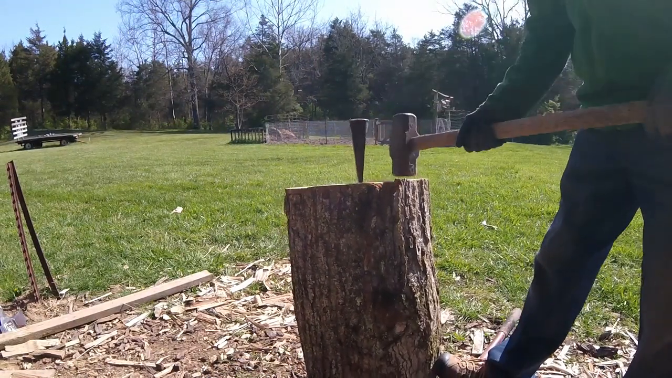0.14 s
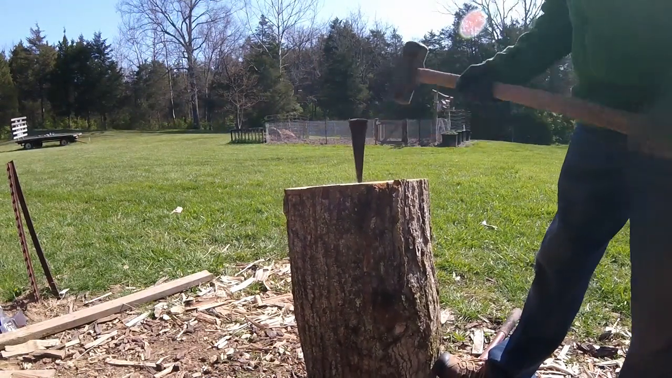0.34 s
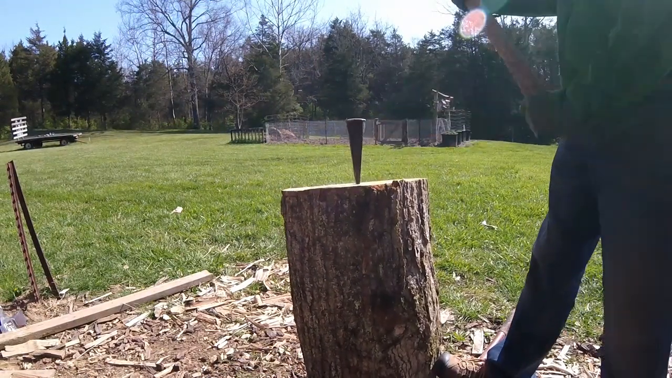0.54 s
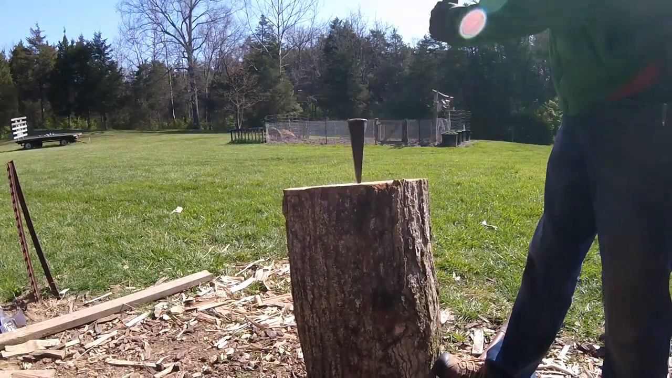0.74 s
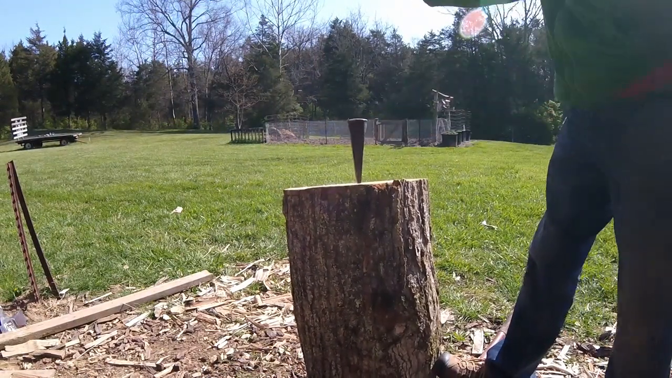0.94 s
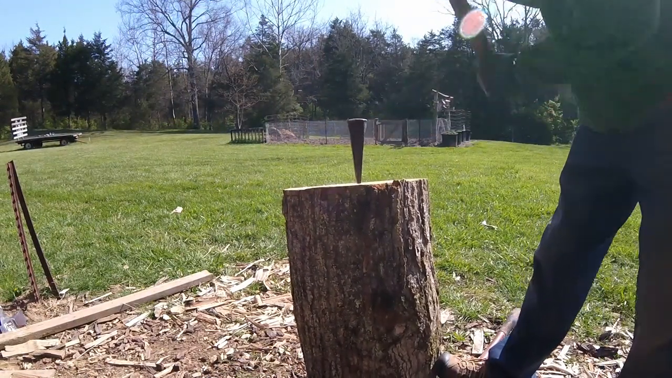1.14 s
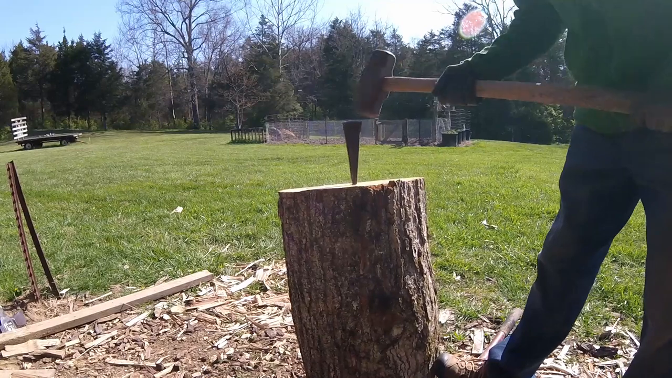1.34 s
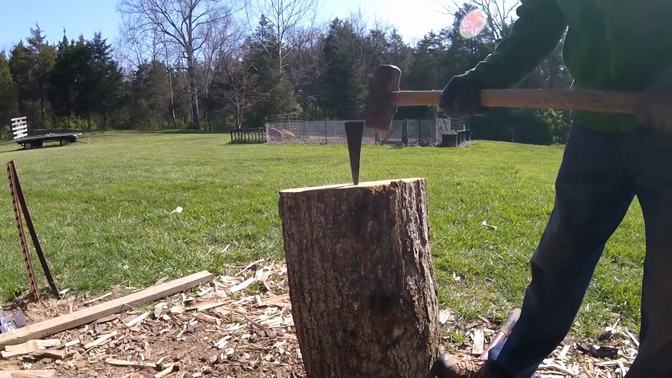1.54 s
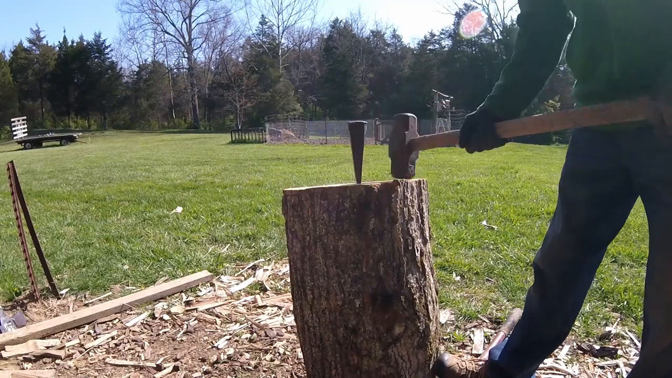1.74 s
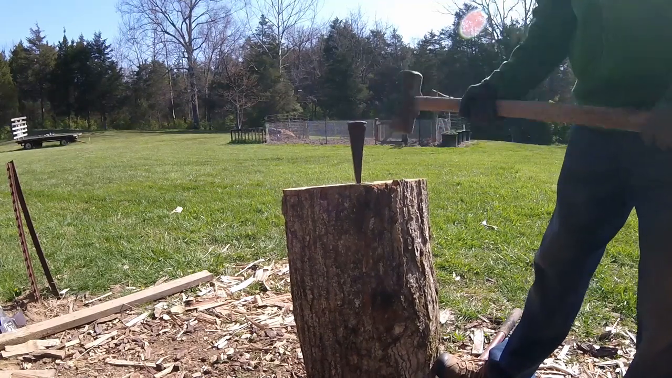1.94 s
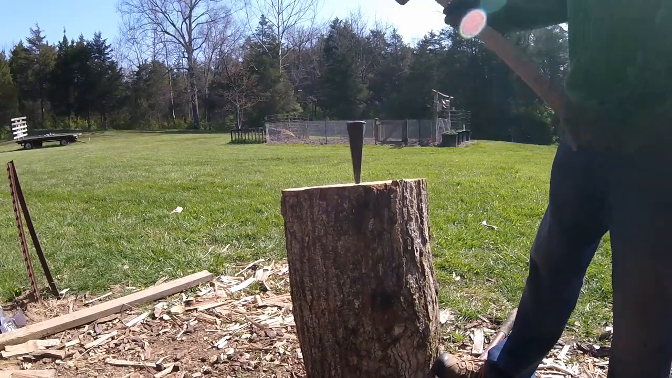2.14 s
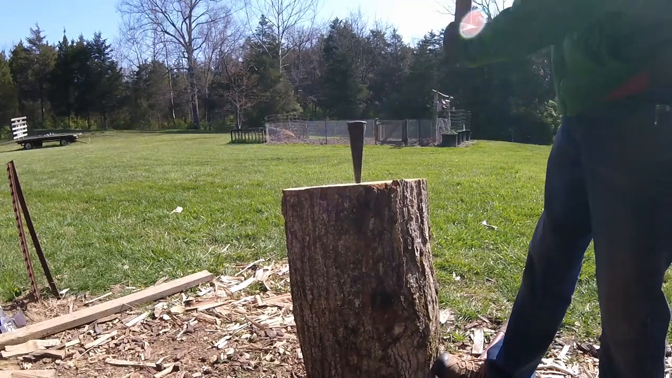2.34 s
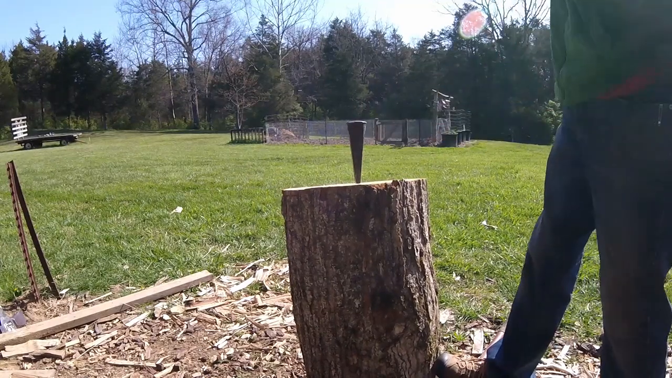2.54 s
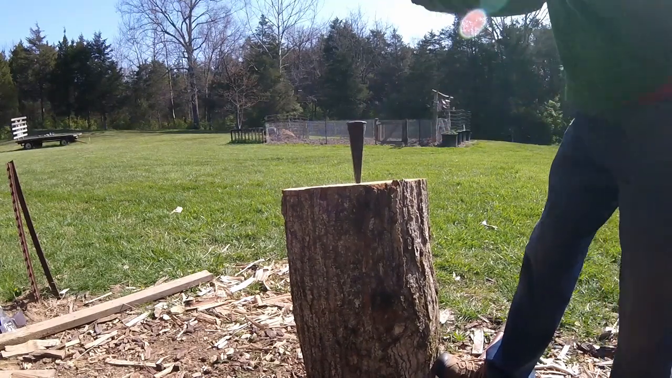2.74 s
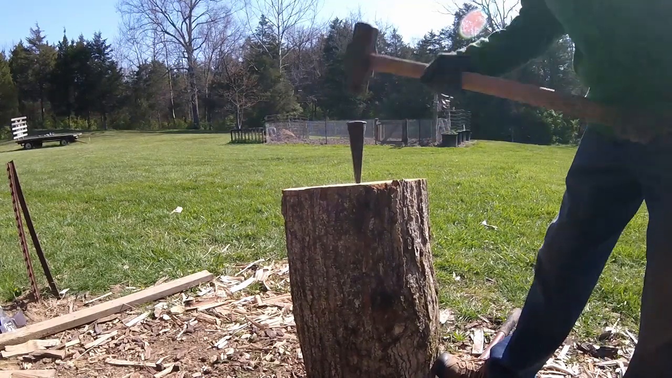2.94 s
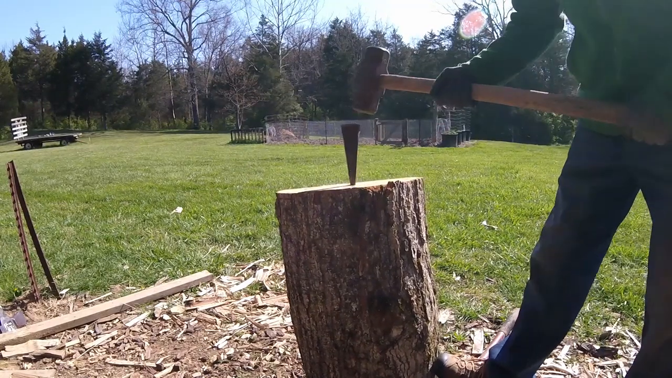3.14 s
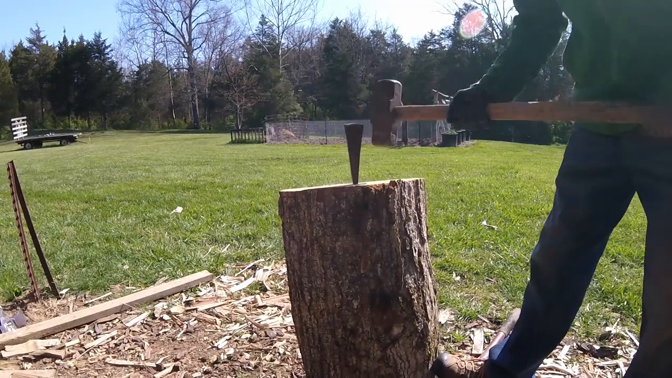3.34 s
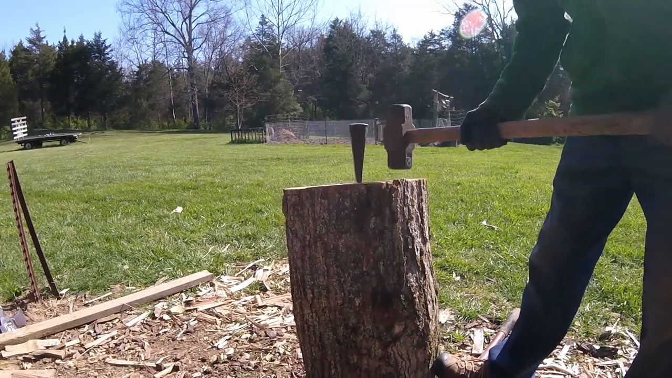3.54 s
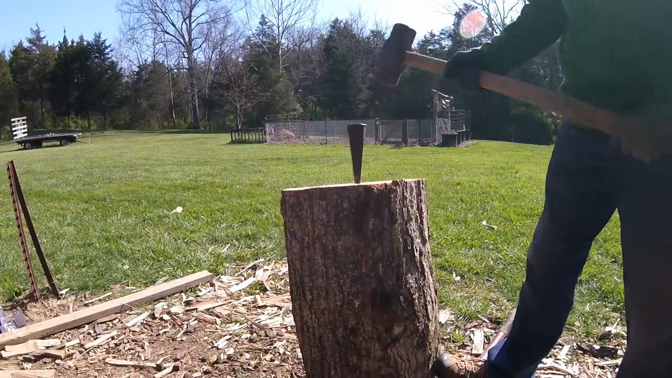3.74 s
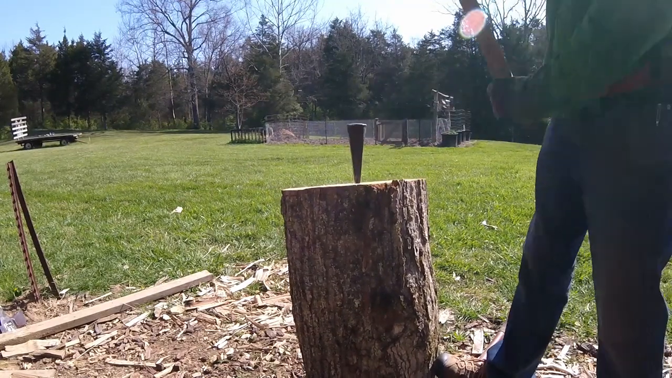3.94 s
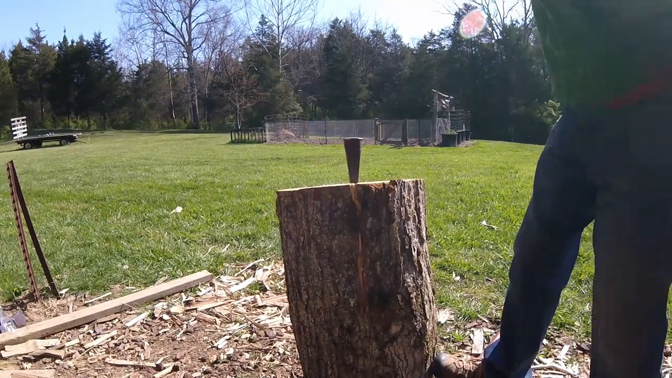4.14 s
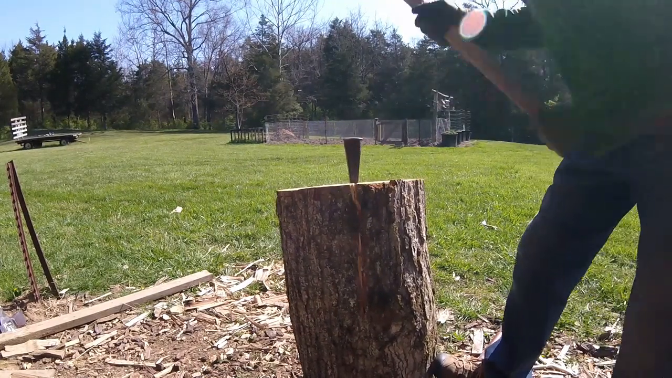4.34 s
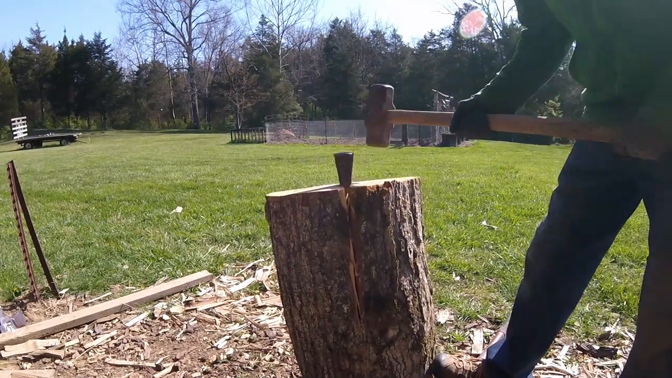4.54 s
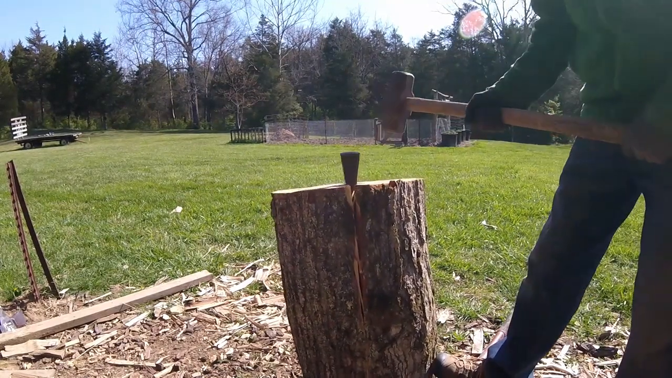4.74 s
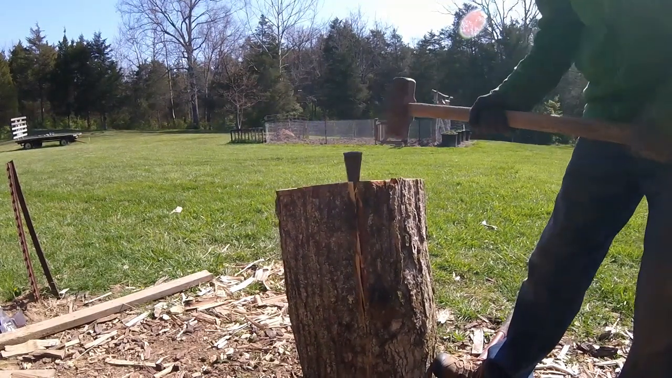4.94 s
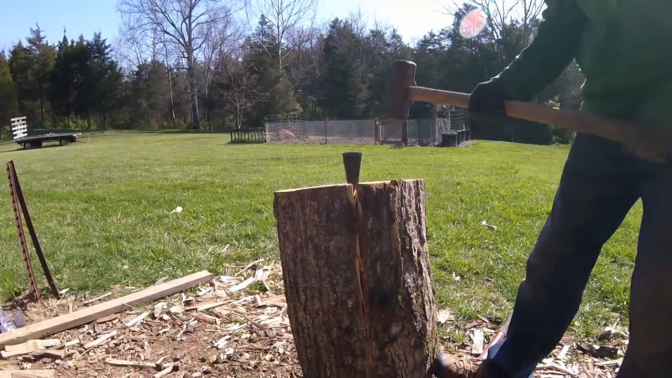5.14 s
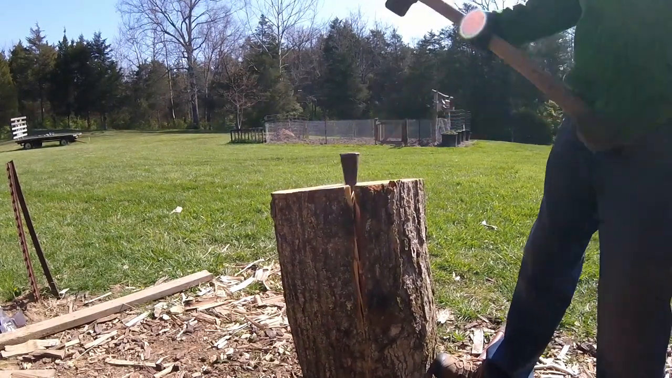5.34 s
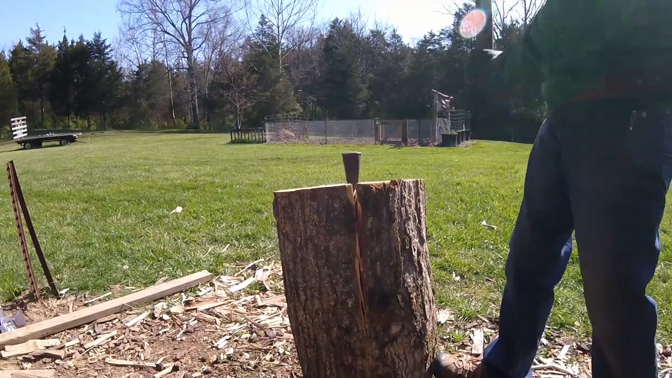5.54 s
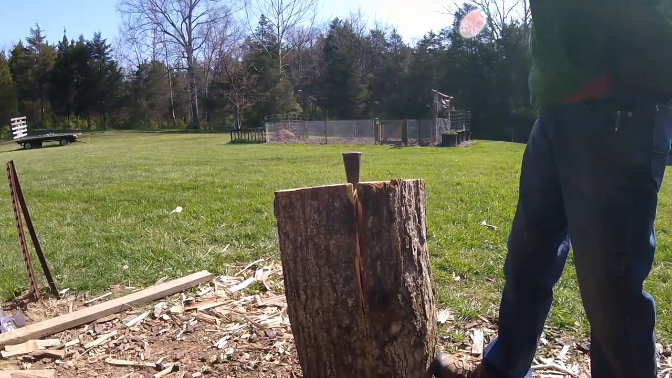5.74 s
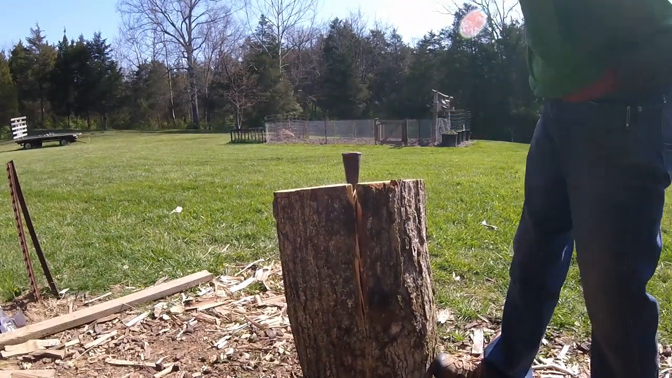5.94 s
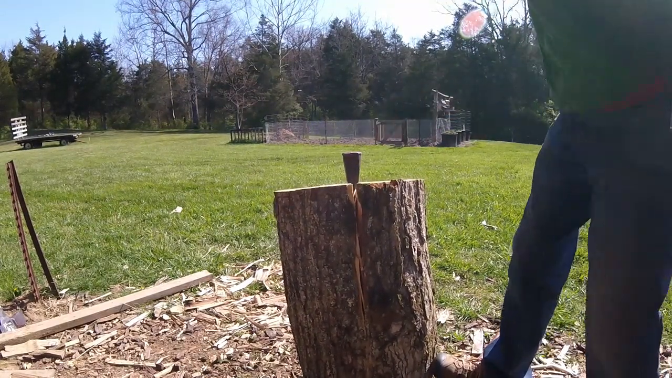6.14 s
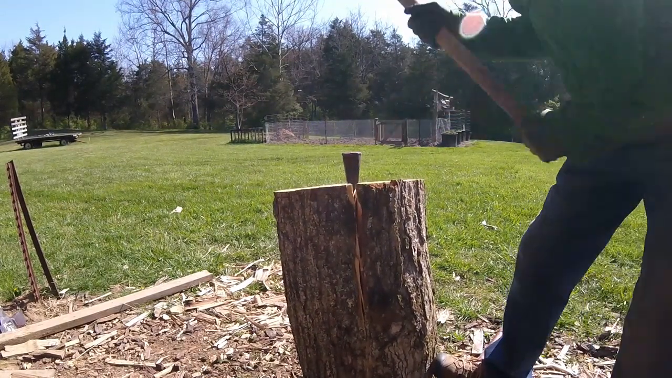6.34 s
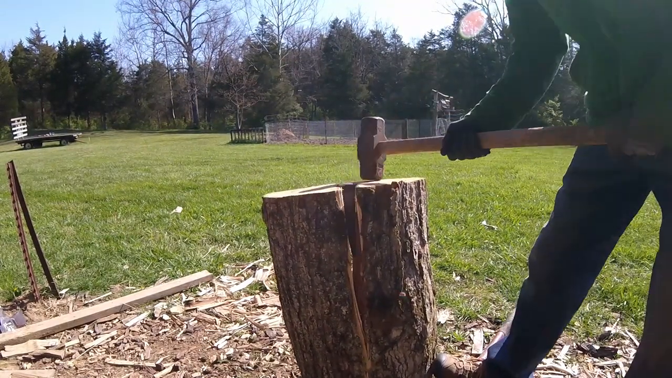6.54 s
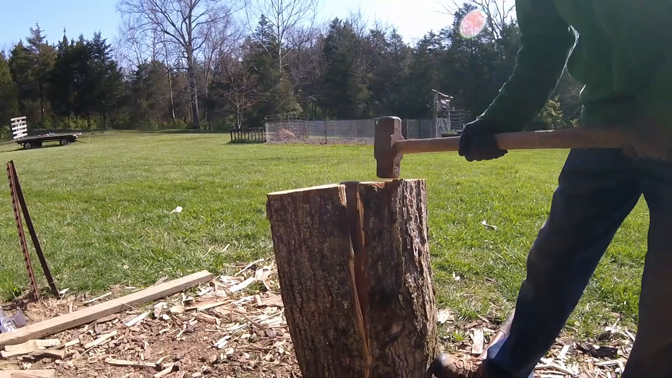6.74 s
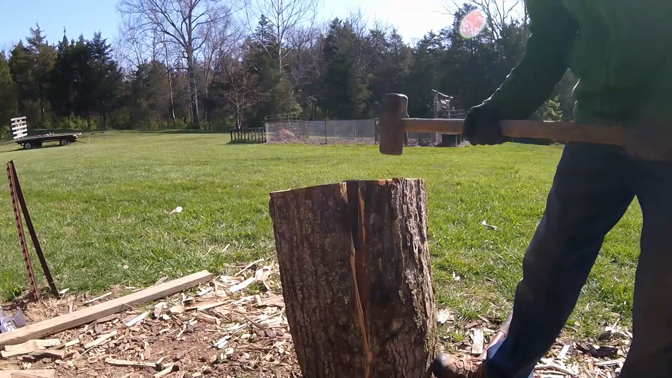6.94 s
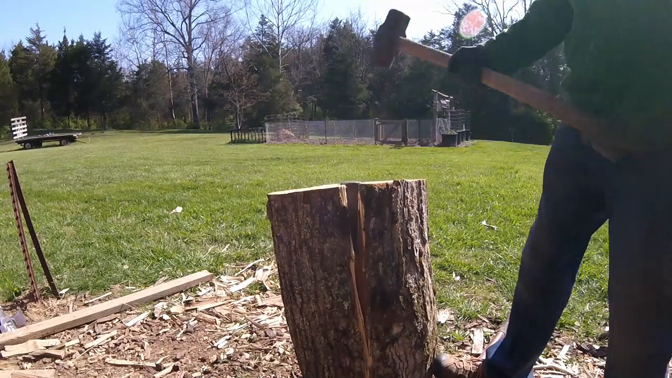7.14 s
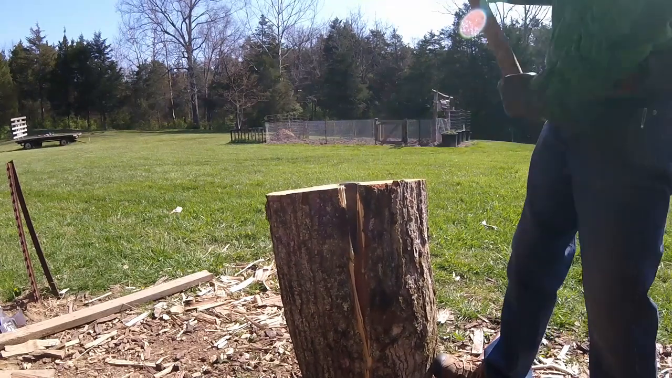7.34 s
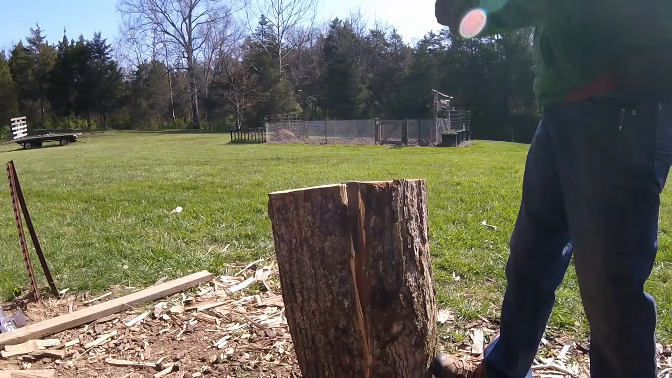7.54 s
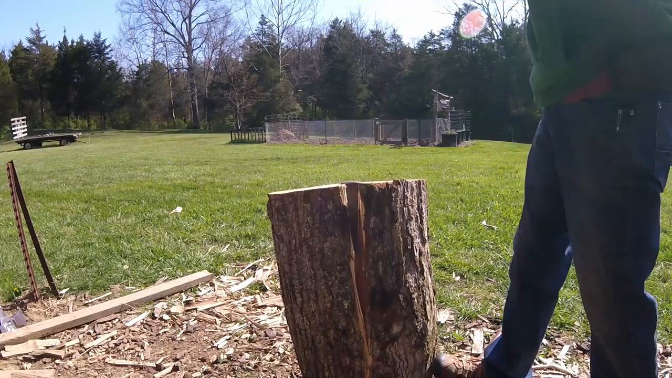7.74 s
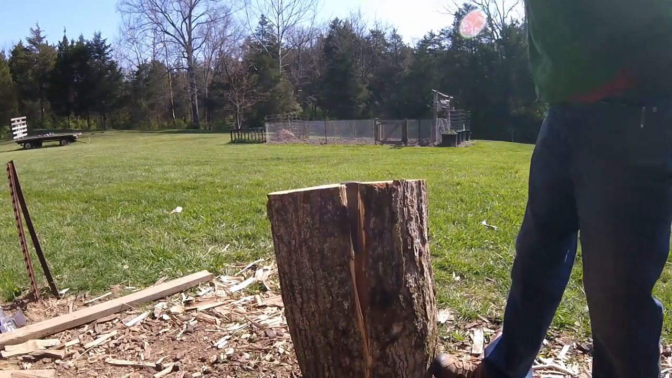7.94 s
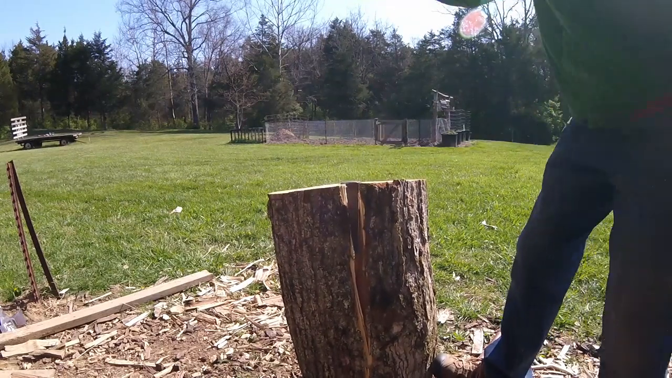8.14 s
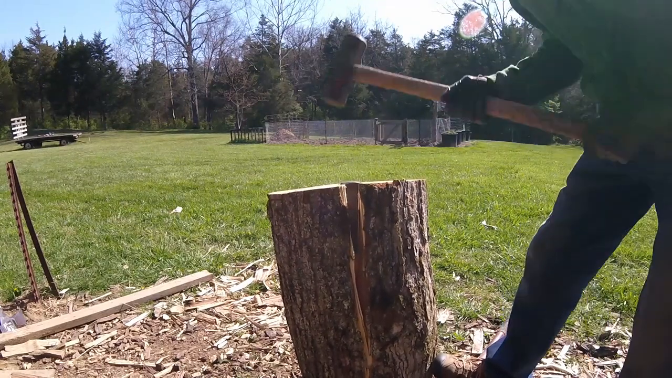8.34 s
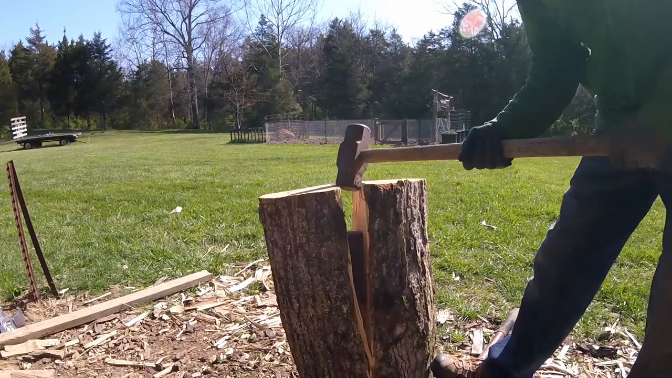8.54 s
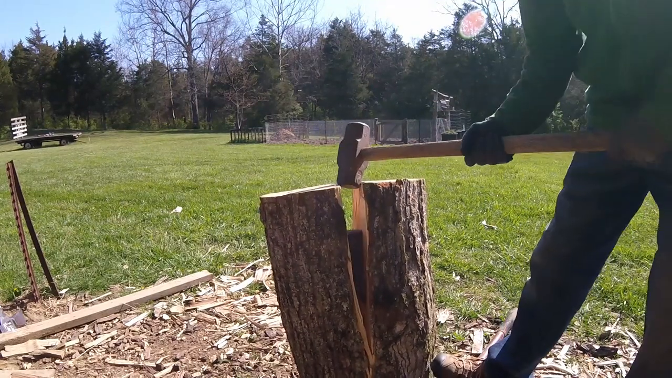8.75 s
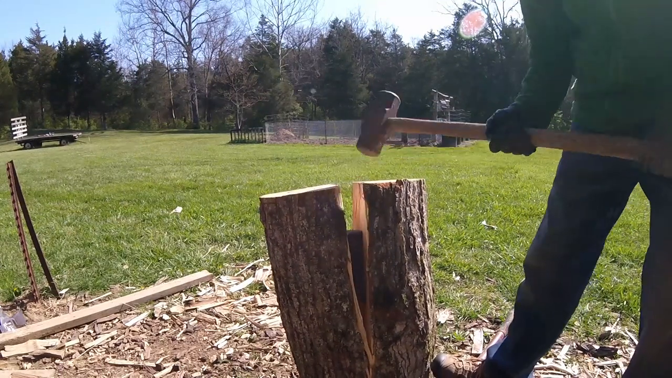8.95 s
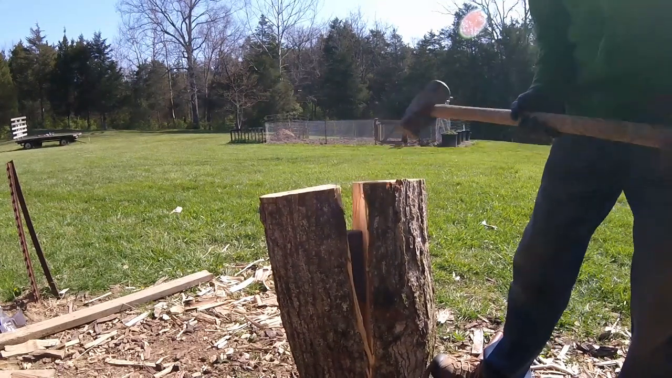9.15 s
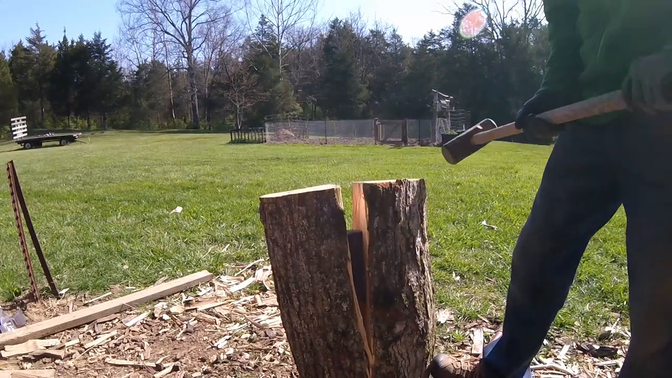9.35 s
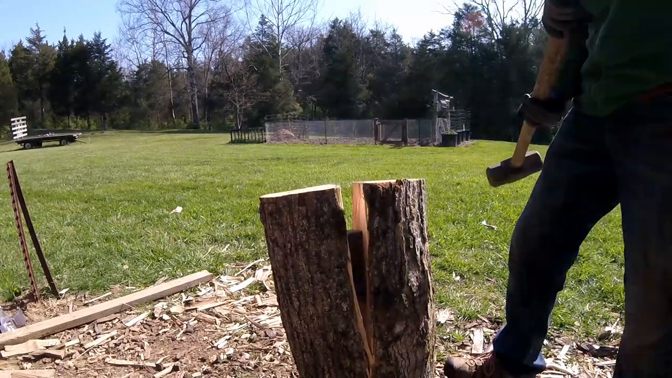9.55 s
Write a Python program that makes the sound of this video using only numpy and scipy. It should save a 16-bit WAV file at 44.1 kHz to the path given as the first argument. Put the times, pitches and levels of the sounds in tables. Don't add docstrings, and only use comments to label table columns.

```python
import sys
import numpy as np
from scipy import signal
from scipy.fft import rfft, irfft
from scipy.io import wavfile
from scipy.ndimage import uniform_filter1d, minimum_filter1d

SR = 44100
rng = np.random.default_rng(int(sys.argv[2]) if len(sys.argv) > 2 else 0)


def voltage_ratio(level):
    return 10 ** (np.asarray(level, float) / 20)


def master_out(mix):
    frames = np.transpose(np.atleast_2d(mix))
    ceiling = np.clip(frames, -1, 1)
    pcm = np.round(ceiling * 32767).astype(np.int16)
    wavfile.write(sys.argv[1], SR, pcm)


N = 426888
EVENT_S = 1.2


def evened(x):
    return x / np.sqrt(np.mean(x ** 2) + 1e-20)


def read(points, hz):
    f, value = np.transpose(points)
    return np.interp(np.log(hz + 1), np.log(f + 1), value)


def curve(rows, t):
    return np.interp(t, *np.transpose(rows))


def add(mix, s, sound):
    at = round(s * SR)
    sound = sound[max(-at, 0):]
    part = mix[max(at, 0):][:len(sound)]
    part += sound[:len(part)]


def noise(points):
    hz = np.fft.rfftfreq(N, 1 / SR)
    spectrum = rfft(rng.standard_normal(N)) * voltage_ratio(read(points, hz))
    return evened(irfft(spectrum, N))


def coloured(x, points):
    hz = abs(np.fft.fftfreq(8192, 1 / SR))
    log_gain = np.log(voltage_ratio(np.maximum(read(points, hz), -100)))
    taps = np.fft.ifft(np.exp(np.conj(signal.hilbert(log_gain)))).real[:4096]
    return signal.oaconvolve(x, taps)[:len(x)]


def bounced(x, echo_ms):
    at = np.arange(len(x))
    return x + .5 * np.interp(at - echo_ms * SR / 1000, at, x, left=0)


def ring(modes, t, waver=0.):
    out = 0
    for hz, db, t60, top, start_db in modes:
        level_db = db + np.where(t < top, start_db * (1 - t / top), -60 * (t - top) / t60)
        sway = np.interp(t, np.arange(100) / 70, rng.standard_normal(100))
        drift = np.interp(t, np.arange(100) / 70, rng.standard_normal(100))
        blur = 3.5 if hz < 2200 else 1
        phase = 2 * np.pi * hz * t + 0.15 * blur * waver * drift
        out = out + voltage_ratio(level_db + waver * sway) * np.sin(phase)
    return out


# (frequency [Hz], t60 [s])
NEAR = [(100, 0.27), (260, 0.23), (700, 0.19), (1800, .21), (4800, 0.19), (10000, 0.076)]
# (frequency [Hz], level [dB])
FAR = [(300, -29), (900, -10), (1400, 0.5), (3500, -1), (5500, -8), (9000, -25.5)]
# (delay [s], level [dB])
TREES = [(.04, -3), (.1, 8.5), (.16, 0.5), (.25, 2.5), (.38, -3.5), (.45, -9), (.7, -27.5), (1.1, -45)]
TREES_DB = -42


def lawn(x, to_near, to_far, near_db, far_db=TREES_DB):
    hz, t, z = signal.stft(rng.standard_normal(SR // 2), SR, nperseg=128)
    near = signal.istft(z * voltage_ratio(-60 * t / read(NEAR, hz)[:, None]), SR, nperseg=128)[1]
    near = near * np.clip(np.arange(len(near)) / SR / 0.0024 - .5, 0, 1)
    t = np.arange(round(EVENT_S * SR)) / SR
    far = coloured(rng.standard_normal(len(t)), FAR) * voltage_ratio(curve(TREES, t))
    scatter = signal.oaconvolve(to_near, near / np.linalg.norm(near))[:len(x)]
    trees = signal.oaconvolve(to_far, far / np.linalg.norm(far))[:len(x)]
    return x + voltage_ratio(near_db) * scatter + voltage_ratio(far_db) * trees


# (frequency [Hz], level [dB per Hz])
AIR = [(53, -30.5), (90, -6.5), (222, -14.5), (460, -18), (579, -19.5), (730, -20.5), (851, -21.5),
       (936, -20.5), (2100, -24), (3200, -27), (4350, -34), (5800, -35.5), (6510, -30), (7300, -34),
       (8850, -42), (11500, -58), (19500, -120)]
# (time [s], level [dB])
AIR_DB = [(0.0, -78), (0.21, -71), (6.82, -68), (7.12, -71), (8.52, -66.5), (9.68, -71)]
# (frequency [Hz], level [dB per Hz])
CAPSULE = [(5700, -30), (6250, -7), (6530, 0), (6850, -7), (7500, -30)]
# (frequency [Hz], level [dB per Hz])
WIND = [(8.8, -34), (15, -1.5), (32, 0.5), (53, 0), (200, -26.5), (260, -49), (440, -120)]
# (time [s], level [dB])
WIND_DB = [(0.0, -58), (.62, -61.5), (1.3, -58), (2.05, -62), (2.94, -55.5), (3.95, -65), (4.3, -54.5),
           (5.1, -59), (6.4, -57.5), (7.04, -63), (8.4, -56), (9.0, -63.5), (9.68, -56.5)]


def air(t):
    wind = voltage_ratio(curve(WIND_DB, t)) * noise(WIND)
    wash = voltage_ratio(curve(AIR_DB, t)) * noise(AIR)
    hiss = voltage_ratio(-85.5) * noise(CAPSULE)
    return wash + wind + hiss


# (start [s], length [s], pitch [Hz], sag (negative: rise) [Hz per s], level [dB])
BIRD = [
    (0.733, 0.089, 820, 100, -78),
    (0.811, 0.13, 786, -20, -72.5),
    (3.645, 0.23, 876, 295, -70),
]
# (multiple of pitch [-], level [dB])
OVERTONES = [
    [(2, -4), (3, 0), (4, -12), (6, -14)],
    [(2, -7), (3, 0), (4, -12), (6, -7)],
    [(2, -14), (3, -7), (4, 0), (6, -22)],
]


def bird():
    out = np.zeros(N)
    for (s, length, hz, sag, db), overtones in zip(BIRD, OVERTONES):
        t = np.arange(0, length, 1 / SR)
        flutter = evened(uniform_filter1d(rng.standard_normal(len(t)), size=500))
        pitch_hz = (hz - sag * t ** 2 / length) * (1 + 0.011 * flutter)
        turn = 2 * np.pi * np.cumsum(pitch_hz) / SR
        swell_db = -11 * (2 * (t / length) ** 0.71 - 1) ** 2
        level_db = db + swell_db + 4.5 * flutter[::-1]
        add(out, s, voltage_ratio(level_db) * sum(voltage_ratio(d) * np.sin(k * turn) for k, d in overtones))
    return out


# (time [s], level [dB], pitch [Hz], half length [s])
GLOVE = [
    (0.476, -71.5, 1470, 0.02),
    (3.813, -73, 3480, 0.037),
    (7.591, -63, 2250, 0.042),
]


def glove(t):
    out = 0
    for s, db, hz, half in GLOVE:
        rub = noise([(hz / 4, -40), (hz / 1.75, -6), (hz, 0), (hz * 1.35, -8), (hz * 2.25, -14), (9000, -40)])
        out = out + voltage_ratio(db) * rub * np.exp(-((t - s) / half) ** 2)
    return out


def shake(t):
    rise_s, t60_s = 0.041, 1.3
    envelope = 0
    for row in BLOWS + TAPS:
        since = t - row[0]
        fall = voltage_ratio(row[-1] - 60 * np.maximum(since, 0) / t60_s)
        envelope = envelope + fall * np.clip(since / rise_s, 0, 1)
    return noise(WIND) * envelope


# (time [s], peak [dB], main pitch [Hz], woody body [dB re peak])
SNAPS = [(1.713, -51, 2030, -2), (3.4655, -39.5, 3530, -16), (4.0639, -38.5, 2650, -24),
         (4.135, -53, 2785, -9), (4.2088, -55, 2390, -16.5), (4.3371, -46, 4380, -21.5),
         (5.0903, -49.5, 3610, -6), (5.1145, -40.5, 2610, -1), (5.2215, -52, 3340, -10),
         (5.4035, -50.5, 2640, -6), (5.9824, -47, 2670, -5.5), (6.134, -46.5, 2720, -5),
         (6.3086, -46.5, 1950, -13.5), (6.4466, -53, 2170, -9), (7.7948, -47, 2110, -15),
         (7.8504, -46.5, 2026, -17), (8.1744, -52, 3007, -17), (9.2161, -46, 4970, -13)]
# (time [s], peak [dB], main
# pitch [Hz])
DRY_SNAPS = [(0.247, -55, 5900), (3.9986, -56.5, 3080), (4.1828, -51, 5300), (4.2671, -53, 5540),
             (4.2836, -54.5, 5540), (4.2995, -55, 6300), (4.3782, -47.5, 2540), (4.6225, -24.5, 4800),
             (4.7346, -44, 5960), (4.752, -46, 5300), (4.9222, -61, 5300), (5.356, -51.5, 3330),
             (5.5795, -48, 4130), (5.677, -52.5, 2980), (5.8396, -46, 5220), (5.9559, -55, 2940),
             (6.7305, -38.5, 4380), (6.765, -44, 4450), (6.7754, -54.5, 4515), (7.083, -54, 4140),
             (7.3308, -51, 4630), (7.676, -42, 4640), (8.97, -50.5, 4770), (9.0927, -50, 4970),
             (9.1262, -48, 4810), (9.1705, -35.5, 4770), (9.2228, -34, 3540), (9.2426, -40, 2720),
             (9.257, -47.5, 4730),
             (4.1044, -62, 6460), (4.3117, -51.5, 6500), (4.6614, -54, 3810), (4.6964, -56, 3940),
               (4.7007, -64, 4040), (4.7404, -48, 5290), (4.7564, -57, 3810), (4.8334, -65, 3980),
               (5.1115, -48.5, 6840), (5.2674, -64.5, 6520), (5.4505, -56, 4940), (5.5264, -68, 4580),
               (5.6104, -61.5, 6500), (5.7674, -64, 6400), (6.0267, -56, 6340), (6.0634, -62, 3840),
               (6.168, -61, 4130), (6.328, -55.5, 6570), (6.3604, -66, 4580), (6.408, -56, 6330),
               (6.6465, -35, 3800), (6.8464, -60, 4300), (7.127, -60, 5330), (7.3173, -55, 4590),
               (7.4254, -64, 6520), (7.5088, -57, 4390), (7.8944, -65, 6520), (8.1261, -61.5, 6760),
               (8.4003, -61, 4670), (9.25, -47, 4740)]
# (frequency [Hz], level [dB])
SNAP_COLOUR = [(600, -37.5), (1800, -4), (3000, -3.5), (5500, -1.5), (7000, -10), (9000, -21.5),
               (12000, -55)]
# (frequency [Hz], level [dB], t60 [s], swells until [s], starts at [dB])
SPLIT = [(1510, -2.5, 0.022, 0.0032, -12.5), (1780, -7.5, 0.0081, 0.0029, -12)]


def snaps():
    delay_s, dry_body_db = 0.0015, -22
    out, t = np.zeros(N), np.arange(2500) / SR
    rows = [*SNAPS, *[(*row, dry_body_db) for row in DRY_SNAPS]]
    grits = rng.standard_normal((len(rows), len(t)))
    echoes_ms = 0.24 + 0.97 * rng.random(len(rows))
    for (s, db, hz, body_db), grit, echo_ms in zip(rows, grits, echoes_ms):
        burst = bounced(coloured(grit * voltage_ratio(-60 * t / 0.0038), SNAP_COLOUR), echo_ms)
        burst = coloured(burst, [(hz / 3, -9), (hz, 0), (hz * 2, -8)])
        pitch = ring([(hz, -10, .006, .0007, -15)], t) + voltage_ratio(body_db) * ring(SPLIT, t)
        add(out, s + delay_s, voltage_ratio(db) * (burst / abs(burst).max() + pitch))
    return lawn(out, out, out, -14.5)


def strike(db, contact_ms, crack_t60, echo_ms, near_db, far_db, colour, modes):
    t = np.arange(round(EVENT_S * SR)) / SR
    fade_db = -60 * np.maximum(t - contact_ms / 1000, 0) / crack_t60
    impulse = 1. * (t == 0)
    grit = rng.standard_normal(len(t)) * voltage_ratio(fade_db)
    push = evened(bounced(coloured(impulse, colour), echo_ms))
    crush = evened(bounced(coloured(grit, colour), echo_ms))
    crack = push / max(contact_ms, 1.2) + crush
    size = abs(crack).max()
    tone = ring(modes, t, waver=2.6) * np.minimum(t / .0012, 1) ** 2
    to_near, to_far = push / size + 0.55 * tone, push / size + 0.47 * tone
    return voltage_ratio(db) * lawn(crack / size + tone, to_near, to_far, near_db, far_db)


def struck(rows, colours, modes, lag=0):
    out = np.zeros(N)
    for row, colour, mode in zip(rows, colours, modes):
        add(out, row[0] + lag, strike(*row[1:], colour, mode))
    return out


# (time [s], peak [dB], contact [ms], crack t60 [s], ground shake [dB])
TAPS = [
    (0.133, -19.5, 3.15, 0.0085, -50.5),
    (1.632, -28, 6.1, 0.0029, -80),
    (1.843, -25.5, 6, 0.018, -57.5),
    (3.565, -12.5, 1.33, 0.014, -51.5),
    (4.998, -24, 1.4, 0.01, -84),
    (6.2192, -30.5, 0.49, 0.012, -78.5),
    (6.552, -10, 0.74, 0.012, -53),
]
# (frequency [Hz], level [dB per Hz])
TAP_COLOURS = [
    [(59, -61), (100, -21), (773, 0), (1020, -24.5), (1230, 2), (1700, -16), (4950, -35.5), (8850, -66.5)],
    [(59, -45), (100, -20.5), (898, -3.5), (1080, -9), (1260, 9), (2340, -13), (4680, -69), (8850, -63)],
    [(59, -33), (100, -26.5), (583, -1), (787, -21.5), (1230, -7), (1380, -25), (2610, -25), (8850, -59)],
    [(59, -47), (100, -28), (493, 10), (787, -11), (1190, -2.5), (1500, -12.5), (5230, -23), (8850, -63)],
    [(59, -51), (100, -59), (483, -0.5), (1080, -10), (2870, 2.5), (3100, -3), (4950, 10.5), (8850, -21.5)],
    [(59, -29.5), (100, -20.5), (1060, -27), (1490, 1), (1870, -16.5), (3950, -18), (6560, -15),
     (8850, -53)],
    [(800, -23.5), (2500, -7), (4500, -7.5), (6000, -6.5), (8500, -30.5)],
]
# (frequency [Hz], level [dB re crack], t60 [s], swells until [s], starts at [dB])
TAP_MODES = [
    [(210.5, -14.5, 0.12, 0.0018, -23.5), (410, 3, 0.011, 0.0011, 8), (815, -13, 0.084, 0.0019, -10.5),
     (975, -19, 0.098, 0.0034, -16)],
    [(1273, -2.5, 0.049, 0.0057, -16), (1555, -9, .04, 0.0065, -9), (930, -19, 0.064, 0.0074, -16),
     (374, -23, 0.035, 0.0026, 1)],
    [(204, -11, 0.14, 0.0019, 1), (424, 10, 0.019, 0.00062, -5), (792, -7.5, 0.11, 0.0024, -15),
     (1020, -32, 0.093, 0.0053, -12)],
    [(212, -15.5, 0.087, 0.0027, -10), (876, -20, 0.17, 0.0017, 8), (434, -3, 0.018, 0.0033, -42),
     (649.7, -19.5, 0.12, 0.022, 6), (1206, -18, 0.016, 0.018, -9)],
    [(2800, -8, 0.01, 0.0005, -5), (530, -28, 0.057, 0.0023, 2)],
    [(1600, -20.5, 0.085, 0.0022, -2)],
    [(3540, -17.5, 0.054, .002, -2)],
]
# (ground bounce [ms], near scatter [dB])
TAP_GROUND = [(1.072, -11), (1.09, -7.5), (1.1, -11), (1.05, -11), (0.521, -10.5), (1.2, -11), (.6, -7)]


def taps():
    tap_delay_s = 0.00088
    rows = [(*row[:-1], *ground, TREES_DB) for row, ground in zip(TAPS, TAP_GROUND)]
    colours = [c + [(11400, c[-1][1] - 22.5), BLOW_TOP[-1]] for c in TAP_COLOURS]
    rebound = struck(rows[-1:], colours[-1:], TAP_MODES[-1:])
    set_down = struck(rows[:-1], colours, TAP_MODES, tap_delay_s)
    return set_down, rebound


# (delay [s], frequency [Hz], level [dB])
SLIDES = [
    (4.504, [[(0, 3540, -20.5), (.005, 3575, -10), (.015, 3623, -24.5), (.045, 3632, -32.5), (.065, 3430, -43.5), (.097, 3550, -53.5), (.107, 3450, -33.5), (.12, 3560, -54.5), (.45, 3548, -80.5)]]),
    (6.509, [[(0, 3596, -17.5), (.009, 3529, -8.5), (.017, 3417, -19), (.028, 3595, -22.5), (.046, 3460, -28.5), (.056, 3523, -36), (.065, 3544, -30), (.1, 3460, -50), (.3, 3500, -83)]]),
    (8.481, [[(0, 3540, -23.5), (.02, 3456, -14), (.039, 3520, -11), (.051, 3550, -32.5), (.06, 3450, -21.5), (.08, 3555, -35.5), (.1, 3550, -47), (.135, 3515, -49), (.3, 3570, -94)], [(0, 5800, -29.5), (.011, 5967, -15), (.024, 5985, -26), (.035, 5980, -24.5), (.049, 5975, -31.5), (.072, 5972, -23.5), (.092, 6020, -31), (.145, 5980, -47.5), (.3, 6010, -98)], [(0, 750, -32.5), (.011, 851, -23.5), (.037, 856, -39.5), (.05, 854, -30.5), (.08, 844, -50.5), (.1, 855, -63), (.14, 856, -69.5), (.25, 850, -87)], [(.064, 6760, -78), (.07, 6640, -44.5), (.11, 6640, -53), (.2, 6675, -85.5)]]),
]


def slides():
    out, t = np.zeros(N), np.arange(round(EVENT_S * SR)) / SR
    for s, tones in SLIDES:
        steel = 0
        for rows in tones:
            at, hz, db = np.transpose(rows)
            flutter = np.interp(t, np.arange(300) / 250, rng.standard_normal(300))
            level_db = np.interp(t, at, db, right=-200) + 1.94 * flutter
            phase = 2 * np.pi * np.cumsum(np.interp(t, at, hz)) / SR
            steel = steel + voltage_ratio(level_db) * np.sin(phase)
        steel = steel * np.sin(np.minimum(t / .002, 1) * np.pi / 2) ** 2
        add(out, s, lawn(steel, steel, steel, near_db=-16.5, far_db=-43))
    return out


# (time [s], peak [dB], contact [ms], near scatter [dB], ground shake [dB])
BLOWS = [
    (1.362, -3.5, 1.37, -5.5, -43),
    (3.061, -4, 2.15, -6, -45),
    (4.504, -4, 3.22, -9, -46.5),
    (6.509, -2.5, 4.7, -7, -49),
    (8.481, -6.5, 2.63, -4.5, -41),
]
EARLIER_BLOW = [(-.38, -1, 4.5, -20, -50)]
# (frequency [Hz], level [dB per Hz])
BLOW_COLOURS = [
    [(35, -30), (60, -12.5), (133, -27), (206, -15.5), (527, -24), (907, -16), (1050, -10.5), (1410, -4.5),
     (1560, -14.5), (2010, -9), (3110, -15), (4730, -11.5), (6300, -18.5), (7400, -30)],
    [(35, -21), (60, -8.5), (133, -38), (215, -10), (428, -19.5), (550, -12), (987, -17), (1220, -6),
     (1890, -3.5), (2230, -14.5), (2630, -9.5), (6470, -15.5)],
    [(35, -59), (60, -25.5), (120, -16.5), (202, -3), (455, -9.5), (600, -12.5), (950, -16), (1240, -9.5),
     (2630, -12.5), (3530, -8), (4080, -14), (6890, -23)],
    [(35, -59.5), (60, -29.5), (193, -10.5), (362, -3.5), (600, -8), (852, -10), (1100, -11), (3150, -15),
     (3530, 4.5), (3900, -12), (7180, -22.5)],
    [(35, -45.5), (60, -24.5), (393, -11), (752, -9.5), (2370, -14), (3460, -2), (4000, -13.5), (5140, -17),
     (6080, -17), (6470, -16.5), (8310, -34)],
]
# (frequency [Hz], level [dB per Hz])
BLOW_TOP = [(8850, -43.5), (11500, -66.5), (14300, -71.5), (15500, -120)]
# (frequency [Hz], level [dB re crack], t60 [s], swells until
# [s], starts at [dB])
BLOW_MODES = [
    [(8120, -54, .22, 0.06, -19.5)],
    [(200, -29, 0.11, 0.0013, -1), (1120, -17, 0.028, 0.005, -1.5), (8240, -61, .15, 0.022, -8)],
    [(3640, -25.5, .15, .03, -1.5), (3430, -30.5, 0.16, .03, -6.5), (4800, -23, .04, .012, -9),
     (1653, -25.5, .1, .006, -7.5), (1000, -26.5, 0.091, .006, -3.5), (7020, -35, 0.13, 0.0078, -1),
     (8050, -50, 0.2, 0.03, -3)],
    [(557.4, -10.5, 0.025, 0.0024, -16.5), (391, -30, 0.2, 0.0055, -18), (10500, -61.5, .12, 0.016, -3),
     (937, -24, 0.16, 0.0033, -3.5), (3640, -25.5, .09, .009, 0), (3340, -17, .05, 0.011, -7),
     (7030, -24.5, 0.089, 0.012, -8), (8037, -47.5, 0.21, 0.066, -11), (8070, -38.5, 0.081, 0.027, -9.5)],
]
LOOSE_MODES = [(605, -29, 0.18, 0.012, -5.5), (7000, -30.5, 0.15, 0.012, -6.5), (3660, -19, .1, 0.022, 1),
               (202.8, -30, 0.3, 0.0085, -15), (8060, -41, 0.24, 0.027, 8.5),
               (8170, -40.5, 0.11, 0.044, -6), (14080, -68.5, .13, .01, 0)]
HEAD_MODE = [(12350, -72, .16, .02, -8)]
# (ground bounce [ms], tree line [dB])
BLOW_GROUND = [(1.48, -35.5), (1.5, -37), (1.5, -35.5), (1.5, -40), (1.501, -41.5)]


def blows():
    crack_t60_s = .017
    colours = [c + BLOW_TOP for c in BLOW_COLOURS]
    steel = [m + HEAD_MODE for m in BLOW_MODES + [LOOSE_MODES]]
    rows = [(*row[:3], crack_t60_s, echo, row[3], far)
            for row, (echo, far) in zip(EARLIER_BLOW + BLOWS, BLOW_GROUND[:1] + BLOW_GROUND)]
    return struck(rows, colours[:1] + colours, steel[:1] + steel) + slides()


# (time [s], depth [dB])
DIPS = [
    (1.317, 16),
    (3.016, 24.5),
    (4.443, 17.5),
    (6.459, 13),
    (8.443, 21.5),
]


def limiter_db(t):
    recovery_s = 0.26
    gain_db = 0
    for (s, depth), blow in zip(DIPS, BLOWS):
        step = np.clip((t - s) / 0.0037, 0, 1)
        gain_db = gain_db - depth * step * np.exp(-np.maximum(t - blow[0], 0) / recovery_s)
    return gain_db


def scene():
    t = np.arange(N) / SR
    loud = blows()
    set_down, rebound = taps()
    quiet = set_down + snaps() + air(t) + glove(t) + bird()
    return (loud + rebound + shake(t) + quiet * voltage_ratio(limiter_db(t)))[None]


def low_pass(x):
    return signal.sosfilt(signal.butter(12, 14500, fs=SR, output="sos"), x)


def record(dry):
    ceiling = .6
    room_left = minimum_filter1d(ceiling / np.maximum(abs(dry), ceiling), size=61)
    held = dry * uniform_filter1d(room_left, size=61)
    return low_pass(held)


dry = scene()
out = record(dry)
master_out(out)
```